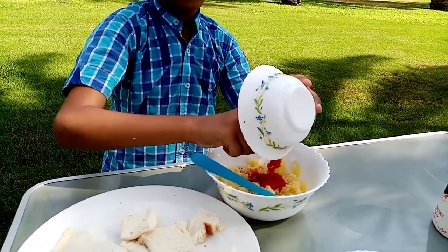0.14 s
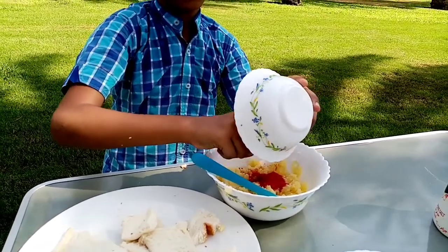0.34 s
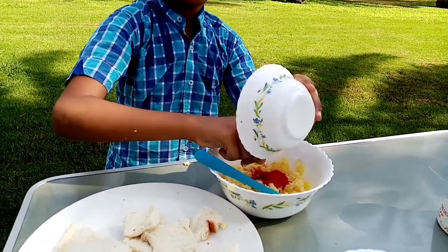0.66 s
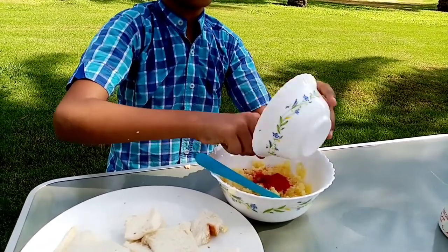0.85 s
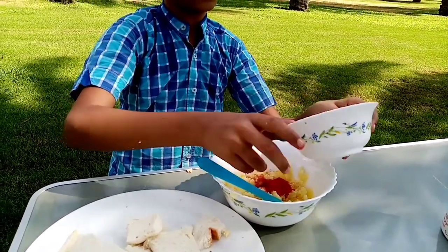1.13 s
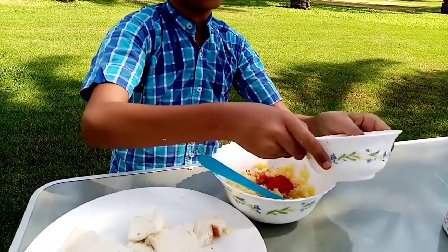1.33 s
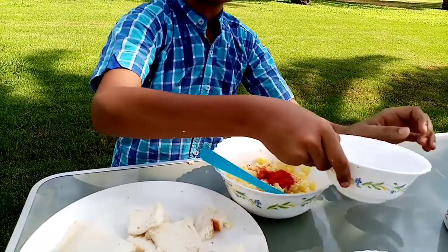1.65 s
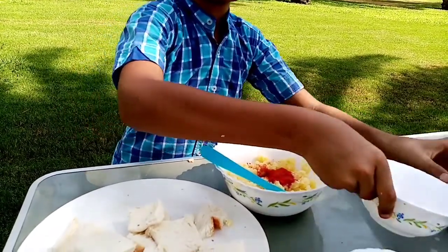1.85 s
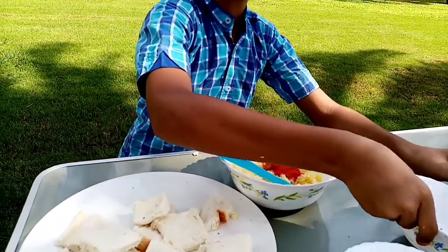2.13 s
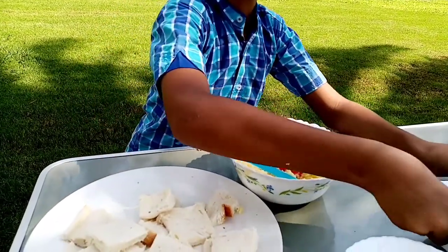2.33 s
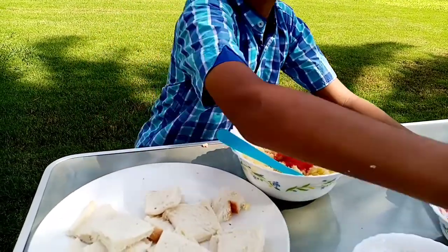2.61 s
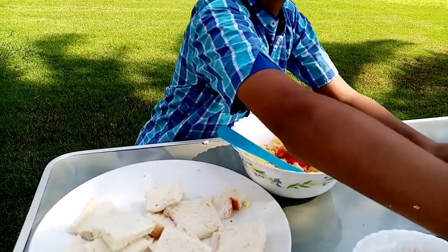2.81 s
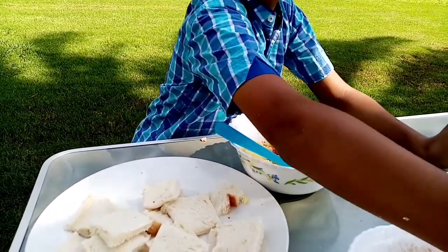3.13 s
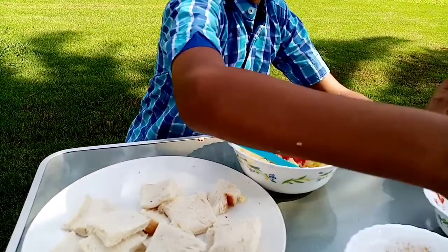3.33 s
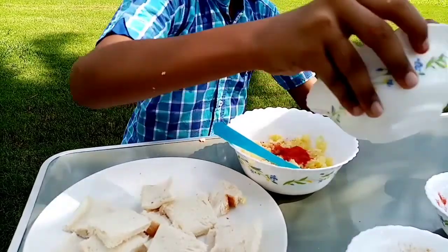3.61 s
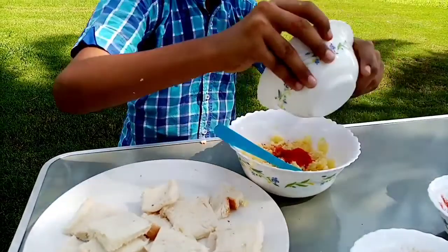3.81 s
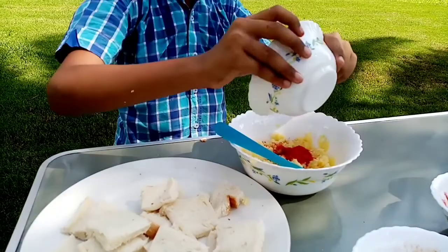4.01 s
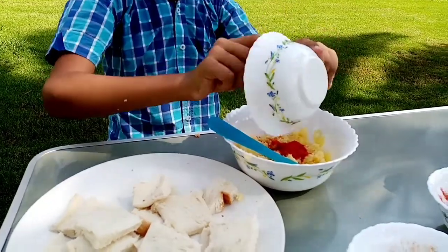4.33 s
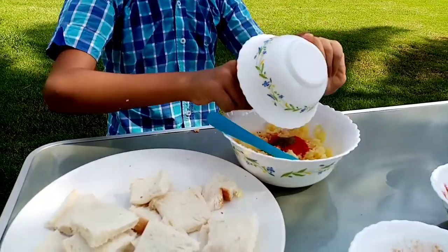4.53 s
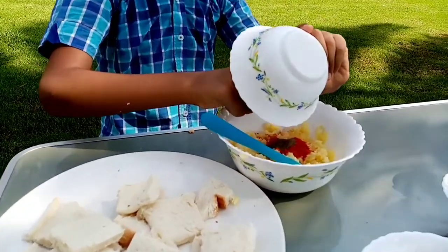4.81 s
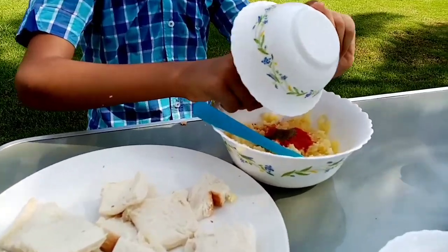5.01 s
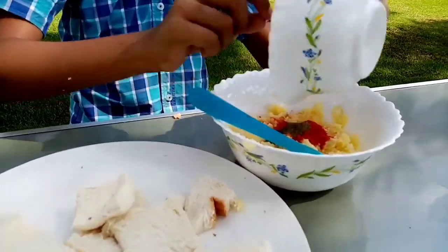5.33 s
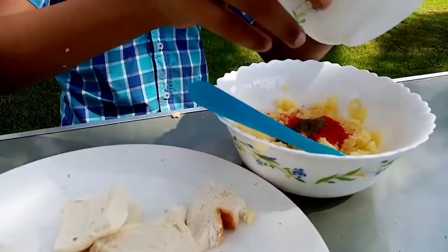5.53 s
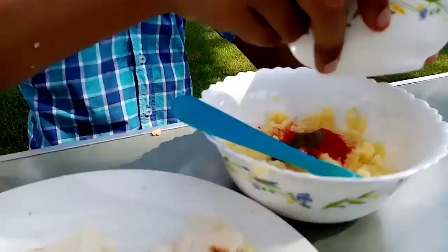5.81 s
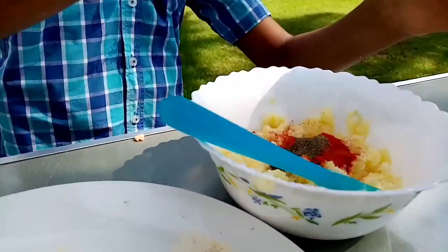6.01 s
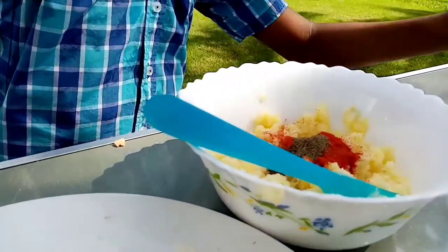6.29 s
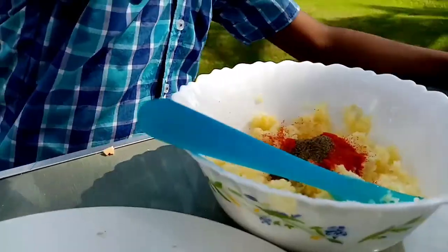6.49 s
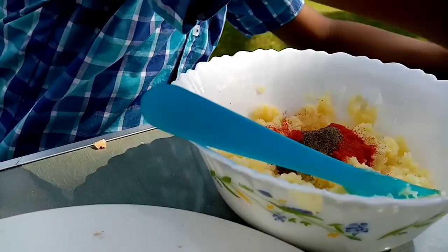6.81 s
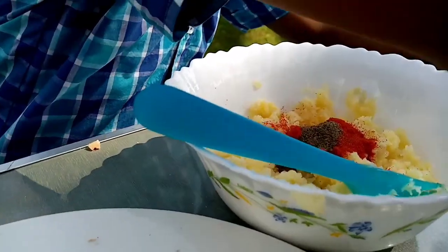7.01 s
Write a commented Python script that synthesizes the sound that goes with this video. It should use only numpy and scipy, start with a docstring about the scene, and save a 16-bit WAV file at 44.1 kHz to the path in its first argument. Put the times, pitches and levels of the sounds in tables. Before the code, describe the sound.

A quiet garden with a steady, low hum of distant traffic, a little stronger on the right. From 0 to 1.7 seconds small birds twitter busily in short, thin, gliding whistles with a couple of harsher squeaks, and a very faint high insect buzz swells until about 1.2. At 1.44 a light china clink rings close by. At 1.95 a bowl hits the glass table with a loud, short knock, then rattles in uneven taps from 2.2 to 2.5, with a faint tap at 2.97. Birds continue more sparsely, with clear falling whistles at 3.8 and 4.2. Soft hand and leaf rustle rises near 5.9; a distant, rough crow caw sounds at 5.7 to 6.0. Tiny ticks on china follow from 6.1. At 6.76 another bowl lands with a bright, hard clatter, knocking again at 7.08 amid chirps and rustling.

```python
"""China bowls knock against each other and are set down on a glass garden table, close to spaced microphones:
each blow and its noisy chatter excite banks of decaying modes. Songbirds whistle in the trees as gliding near-sines,
a crow caws once as a frequency-modulated tone, and all of them echo in the trees; an insect buzzes as narrow-band
noise. Distant traffic hums as third-octave noise under the rustle of leaves and hands, which is banded noise."""
import sys
import numpy as np
from scipy import signal
from scipy.io import wavfile
from scipy.ndimage import uniform_filter1d

SR = 44100
rng = np.random.default_rng(int(sys.argv[2]) if len(sys.argv) > 2 else 0)


def persist_wave(psi):
    """Save psi, clipped to +-1, as 16-bit WAV."""
    counts = np.round(np.clip(psi, -1, 1) * 32767).astype(np.int16)
    wavfile.write(sys.argv[1], SR, np.atleast_2d(counts).T)


N = 315309
t = np.arange(N) / SR

# Arrival at the left microphone ahead of the right, in seconds
NEAR_LEAD_S, SECOND_BOWL_LEAD_S, BIRD_LEAD_S, FAR_LEAD_S = 0.00086, 0.00058, 0.00101, 0.001188
RIGHT_DB = 3.5  # right minus left level of traffic and of the lower rustle


def undb(db):
    """Decibels are twenty times the logarithm of an amplitude ratio; this inverts them."""
    return 10 ** (np.asarray(db) / 20)


def level(x, db):
    """Root-mean-square amplitude measures level: scales x to db."""
    return x * undb(db) / np.sqrt(np.mean(x ** 2))


def band(x, lo_hz, hi_hz, order=2):
    """A Butterworth band-pass is maximally flat between its two cutoffs."""
    sos = signal.butter(order, [lo_hz, min(hi_hz, 0.45 * SR)], "band", fs=SR, output="sos")
    return signal.sosfilt(sos, x)


def walk(rate):
    """Low-pass random modulation: random values held 1 / rate s and smoothed twice; spread near 1."""
    hold = int(SR / rate)
    steps = np.repeat(rng.standard_normal(N // hold + 1), hold)
    return 2.01 * uniform_filter1d(uniform_filter1d(steps, hold), hold)[:N]


def add(out, pair, s, pan_db, lead_s):
    """Stereo localisation by level and time difference: left is pan_db louder and lead_s earlier."""
    for channel, (start_s, db) in enumerate([(s, pan_db / 2), (s + lead_s, -pan_db / 2)]):
        i = max(int(start_s * SR), 0)
        part = (pair[channel] * undb(db))[:N - i]
        out[channel, i:i + len(part)] += part


def ring(modes, unlike, chatter_t60, chatter_db, crack_db,
         scatter=0.94, crack_from=0.18, alternate=True, size=8000):
    """Modal synthesis: a blow and dying chatter drive decaying modes with a crack between them; peak 1.

    unlike sets how far mode phases (rad) and chatter differ between the microphones."""
    hz, db, t60 = np.transpose(modes)[:, :, None]
    u = np.arange(size) / SR
    chance = scatter * rng.standard_normal((4, len(modes), 1))
    # neighbouring modes may start in opposite directions
    sign = (-1) ** (alternate * np.arange(len(modes))[:, None])
    decay = sign * undb(db + 3 * chance[0] - 60 * u / t60)
    phase = 2 * np.pi * hz * (1 + 0.0062 * chance[1]) * u
    body = np.array([np.sum(decay * np.sin(phase + unlike * side), axis=0) for side in chance[2:]])
    impulse = undb(crack_db) * (u == 0)
    body += band(impulse, crack_from * hz.min(), 0.52 * hz.max(), order=1)
    body = signal.sosfilt(signal.butter(2, 1.13 * hz.min(), "high", fs=SR, output="sos"), body)

    shared, *own = rng.standard_normal((3, size))
    jitter_db = 3.8 * rng.standard_normal(size)
    chatter = undb(chatter_db + jitter_db - 60 * u / max(chatter_t60, 0.005))
    force = (shared + unlike * np.array(own)) * chatter
    contact = 4  # samples that the blow lasts
    force[:, :contact] += np.hanning(contact + 2)[1:-1] * 2 / contact
    out = signal.fftconvolve(body, force, axes=1)[:, :size]
    return out / np.abs(out).max()


def knocks():
    """Modal superposition: each impact thuds in the table top, rings the rim and chatters in the china."""
    # Bowl meets bowl or table, peaks before panning:
    # start_s, thud_peak_db, rim_peak_db, china_peak_db, thud_tilt_db (per octave)
    blows = [(1.9454, -9.5, -18, -24, -7), (1.9521, -20, -28, -30, -4), (1.9622, -30, -35.5, -39, 7),
             (2.004, -30.5, -48, -73, -17), (2.031, -43, -65, -80, -6), (2.1863, -16.5, -29, -34, 7),
             (2.1988, -18.5, -37, -46, 18), (2.2219, -24, -34, -34.5, -1), (2.2331, -22.5, -41, -45, 1),
             (2.2596, -22, -42, -44.5, 5), (2.2754, -25, -59, -61, -2), (2.2882, -34, -65, -80, -21),
             (2.3716, -21.5, -34, -40.5, 15), (2.383, -21, -33, -42, 5), (2.4067, -29.5, -39.5, -39, -1),
             (2.4894, -51, -51.5, -62, -4), (2.971, -36, -53, -66, -16), (6.7586, -9.5, -16, -18, 11),
             (6.7649, -29, -19, -45, 12), (6.7704, -25, -27, -37, 4), (6.779, -24, -42, -22.5, 3),
             (6.786, -17.5, -30, -25, -12), (6.7983, -24.5, -40, -25, 12), (7.0788, -16, -21, -27, 12),
             (7.0908, -23.5, -32, -31.5, 5)]
    # Modes of the table top: pitch_hz, level_db, t60_s
    table_modes = [(110, -16, 0.051), (165, -25, 0.02), (216, -2.5, 0.12), (310, -4.5, 0.036),
                   (370.5, 8.5, 0.065), (482, 4.5, 0.057), (519, -2, 0.044), (570, -2, 0.065),
                   (356, 12, 0.016)]
    # Modes of the bowl's rim: pitch_hz, level_db, t60_s
    rim_modes = [(700, -3, 0.021), (890, -7.5, 0.057), (993, -12.5, 0.075), (1074, -6.5, 0.031),
                 (1285, 0.5, 0.017), (1627, -3.5, 0.02), (1950, 3.5, 0.0096), (2350, -9, 0.0089),
                 (2750, -11.5, 0.0098)]
    # Modes of the china: pitch_hz, level_db, t60_s
    china_modes = [(3430, 15, 0.0038), (3520, 2.5, 0.021), (4420, 5.5, 0.01), (5140, -2, 0.012),
                   (5350, -10, 0.0062), (6090, 19, 0.0029), (6700, 5, 0.011), (7300, -12, 0.007),
                   (9330, -2, 0.007), (9890, -7.5, 0.029), (14300, -26, .01)]
    # Chatter decay for a -21.5 dB thud: table_t60_s, rim_t60_s, china_t60_s
    chatter_t60_s = (0.14, 0.083, 0.05)
    shrink = 0.042  # share of the chatter's length lost per dB of a harder blow
    swap_s = 4.5  # from here the second bowl lands, further right
    first_bowl = (-3, NEAR_LEAD_S)  # left minus right dB, lead s
    second_bowl = (-5.5, SECOND_BOWL_LEAD_S)
    out = np.zeros((2, N))
    for s, thud_db, rim_db, china_db, tilt_db in blows:
        thud_t60, rim_t60, china_t60 = np.array(chatter_t60_s) * (1 - shrink) ** (thud_db + 21.5)
        # a blow near the edge of the top favours its higher modes
        pivot_hz = table_modes[3][0]
        tilted = [(hz, db + tilt_db * np.log2(hz / pivot_hz), t60) for hz, db, t60 in table_modes]
        thud = ring(tilted, 0.38, thud_t60, -30.5, 19.5, scatter=0.65, crack_from=2.0, alternate=False)
        rim = ring(rim_modes, 1.1, rim_t60, -16, 20, scatter=0.7)
        china = ring(china_modes, 1.44, china_t60, -26.0, 4.1)
        china_pair_db = china_db + np.array([[-2.5], [2.5]])
        knock = -undb(thud_db) * thud + undb(rim_db) * rim + undb(china_pair_db) * china
        add(out, knock, s, *(first_bowl if s < swap_s else second_bowl))
    return out


def clink():
    """Impact excitation of a held bowl's modes as rim touches rim."""
    # Rim touches rim, before panning: start_s, peak_db
    touches = [(1.4424, -19)]
    # Modes of the held bowl: pitch_hz, level_db, t60_s
    held_modes = [(393, -8, 0.05), (730, -3.5, 0.045), (1100, -8, 0.049), (1120, 13.5, 0.007),
                  (1610, -1, 0.037), (1900, 4, 0.023), (2410, -14, 0.034), (2924, -2, 0.07),
                  (4534, -8, 0.086), (5000, -8, .02), (6180, -12, 0.022), (6500, -8, 0.025),
                  (8330, -19, 0.025), (9830, -8, 0.019)]
    out = np.zeros((2, N))
    for s, db in touches:
        touch = undb(db) * ring(held_modes, 0.6, 0.09, -24.0, 12.0, scatter=0.3)
        add(out, touch, s, -2.5, NEAR_LEAD_S)
    return out


def singing_rim():
    """Free vibration: a freed rim sings on in one exponentially decaying sine."""
    # Freed rims, before panning: start_s, peak_db
    sings = [(1.945, -55), (2.387, -51.5), (6.798, -53), (7.09, -51)]
    sing_hz, sing_t60_s, attack_s = 1475, 0.66, 0.0018
    out = np.zeros((2, N))
    u = np.arange(SR // 4) / SR
    for s, db in sings:
        envelope = undb(db - 60 * u / sing_t60_s) * np.clip(u / attack_s, 0, 1)
        sing = envelope * np.sin(2 * np.pi * sing_hz * u)
        add(out, [sing, sing], s, -4, NEAR_LEAD_S)
    return out


def ticks():
    """Short band-limited noise bursts: faint ticks of nails and crumbs on china."""
    # Ticks, before panning: start_s, peak_db, centre_hz
    contacts = [(2.0933, -62, 4110), (2.8314, -52, 6500), (2.866, -55, 6400), (2.923, -58.5, 6300),
                (2.967, -61, 6620), (4.645, -56.5, 6400), (4.828, -61, 6350), (5.318, -61.5, 6360),
                (6.1178, -52, 3750), (6.231, -56, 9150), (6.328, -54, 6400), (6.3647, -49.5, 6140),
                (6.374, -54, 4570), (6.4286, -55, 5500), (6.489, -51, 6400), (6.84, -46, 6100),
                (6.8543, -44, 5900)]
    out = np.zeros((2, N))
    u = np.arange(900) / SR
    for s, db, hz in contacts:
        burst = rng.standard_normal((2, len(u))) * undb(-60 * u / 0.053)
        narrow = band(burst, hz / 1.08, hz * 1.06, order=1)
        tick = narrow + undb(-14) * band(burst, hz / 2.6, hz * 1.7)
        add(out, tick * undb(db) / np.abs(tick).max(), s, -13, NEAR_LEAD_S)
    return out


def bowls():
    """Linear superposition of knocks, clink, singing rims and ticks."""
    return knocks() + clink() + singing_rim() + ticks()


def note(length, hz, attack=0.0017, release=0.0018):
    """Phase is the integral of frequency hz(u); returns time u, phase and an envelope of rms 1 for a sine."""
    u = np.arange(0, length, 1 / SR)
    ends = np.clip(u / attack, 0, 1) * np.clip((length - u) / release, 0, 1)
    return u, 2 * np.pi * np.cumsum(hz(u)) / SR, np.sqrt(2) * ends


def whistles():
    """Frequency glide: near-sines slide towards a held pitch and throb as they slide."""
    # Whistled notes, rms before wavering and panning; fade_db is over the note, pan_db is left minus right:
    # start_s, length_s, start_hz, held_hz, slide_s, level_db, fade_db, pan_db
    notes = [(0.0, 0.05, 3390, 3416, .03, -61, 2.5, 8), (0.066, 0.1, 3430, 3520, 0.055, -58.5, -27, 8.5),
             (0.207, 0.016, 3640, 4100, 0.02, -59, -6, -2), (0.229, 0.022, 3720, 4250, 0.017, -57, -9, 0),
             (0.232, 0.025, 4120, 3520, 0.01, -59, -3, 7), (0.218, 0.036, 3210, 3330, 0.018, -62.5, 3, -6),
             (0.303, 0.053, 2850, 2890, .02, -68.5, -1, 1), (0.24, 0.07, 3330, 2870, 0.024, -57, -10, -9),
             (0.313, 0.014, 2410, 1655, 0.018, -56.5, 0, -10), (0.408, 0.025, 3750, 3600, 0.022, -61, 3, 2),
             (.425, .03, 3690, 3780, .02, -65, 2, 2), (0.42, 0.01, 3180, 3450, .012, -66, 0, 2),
             (0.432, 0.054, 3330, 3430, 0.028, -59.5, 9, 4), (0.487, .014, 3530, 2980, 0.015, -57, -4, 1),
             (0.516, 0.14, 3400, 3360, .02, -68, -1, 2), (0.594, 0.016, 2520, 2800, .012, -61, 0, 1),
             (.61, 0.014, 2720, 3320, 0.01, -61, 0, 3), (0.212, 0.013, 1920, 2350, 0.016, -64, 4, -7),
             (0.578, 0.016, 2280, 1950, 0.015, -63, 1, -10), (0.566, 0.016, 2600, 2900, .014, -61, -8, 4),
             (0.614, 0.013, 3520, 4400, 0.0099, -60, 2, 3), (0.625, 0.07, 3430, 2760, 0.0287, -59, 12, 2),
             (0.628, .012, 3930, 3450, .012, -64, -3, 2), (0.705, 0.0085, 2330, 1610, .013, -51, 0, -10),
             (0.719, 0.016, 2300, 1580, .017, -54, -10, -8), (0.726, 0.071, 2760, 2790, 0.022, -73, 5, -7),
             (0.797, 0.062, 3600, 3560, 0.063, -66, 8, 9.5), (0.827, 0.066, 3270, 3450, 0.057, -58, 8, 1),
             (1.004, 0.018, 3780, 2390, 0.019, -47, -7, 1),
             (1.023, 0.012, 2420, 2120, 0.012, -55.5, -4, -2),
             (1.03, 0.033, 3230, 2470, 0.031, -55.5, -1, 3),
             (1.052, 0.043, 3300, 2970, 0.051, -62.5, -3, -10),
             (1.066, 0.022, 2350, 2280, .02, -66, -9, -8), (1.0, 0.014, 5700, 4850, .022, -62, -1, -12),
             (1.05, 0.023, 1720, 1600, .025, -65, -2, 0), (1.229, 0.037, 3620, 3600, 0.026, -56, -3, -7),
             (1.276, 0.064, 3430, 3330, 0.045, -56, 4, 2), (1.328, 0.019, 2800, 2610, 0.015, -62, 2, 5),
             (1.338, 0.052, 3350, 2570, 0.04, -61.5, 3, 1), (1.295, 0.061, 3000, 3200, .06, -69, 7, 2),
             (1.342, .015, 3580, 3380, 0.013, -51, -1, 0), (1.371, .025, 3480, 3050, 0.023, -59, -4, -5),
             (1.375, 0.042, 3760, 3760, .02, -62, -1, -1), (1.336, .022, 5700, 5600, .02, -66, -4, -3),
             (1.587, 0.079, 2750, 3367, 0.063, -63.5, 3.5, -2.5),
             (1.677, 0.014, 3300, 2970, 0.016, -56, -6, 0), (1.685, 0.016, 2900, 2300, 0.012, -63, -4, -7),
             (1.613, 0.071, 1525, 1670, 0.059, -63, -1, -3), (1.705, 0.071, 3350, 3310, .03, -70, -11, -4),
             (1.882, 0.073, 2630, 3176, 0.026, -72, 17.5, -8),
             (1.98, 0.021, 3300, 2630, 0.019, -57, -8, -8), (2.29, 0.08, 2160, 2130, .02, -66.5, -4, -9),
             (2.479, 0.0096, 2380, 1860, 0.02, -51, 0, -6), (2.848, 0.1, 2750, 2650, 0.08, -61, 5, -3),
             (2.935, 0.033, 2650, 2080, .024, -57.5, -5.5, -9),
             (3.178, 0.083, 2160, 2073, 0.026, -63, 1, -13), (3.183, 0.067, 3070, 3170, .08, -72, -11, -9),
             (3.098, 0.084, 3040, 3100, .02, -76.5, 0, -9), (3.288, 0.09, 2410, 2410, 0.055, -60, 0, -4.5),
             (3.398, .016, 3860, 2280, .016, -59, -1, -6), (3.39, 0.0096, 2180, 1950, .012, -53.5, 2, -10),
             (3.41, 0.01, 2200, 1950, .012, -57, .3, -5), (3.715, 0.024, 2870, 2700, 0.01, -66.5, -3, 6),
             (3.761, 0.022, 3490, 3500, .025, -59, 3, 7), (3.781, 0.09, 3480, 1950, 0.064, -48.5, -12, -4),
             (4.048, 0.039, 3230, 3110, 0.035, -75, -4, -12),
             (4.094, 0.021, 3470, 2670, 0.015, -67, -3, -5),
             (4.165, 0.084, 3350, 1936, .061, -49, -9.5, -3), (4.483, 0.11, 3170, 3120, 0.035, -62, -13, 2),
             (4.476, 0.072, 3700, 3840, .03, -74, -10, -9),
             (4.665, 0.069, 2930, 2820, 0.047, -65.5, -0.5, 8.5),
             (4.758, 0.046, 2880, 2880, .03, -75, -2, -1), (4.672, 0.075, 5720, 5760, 0.024, -78, 4, -5),
             (5.519, 0.055, 3760, 3540, 0.049, -65.5, 6, -7),
             (5.546, 0.0082, 2120, 1895, .009, -56, -2, -1), (5.83, 0.065, 3570, 3360, 0.035, -55, -5, 0),
             (5.915, 0.024, 3550, 3370, 0.025, -61, -1, -5), (5.957, 0.13, 3350, 3400, 0.064, -71, -3, -1),
             (6.073, 0.0092, 3830, 3300, 0.01, -54.5, 0, -8.5),
             (6.117, 0.013, 3300, 4070, 0.011, -61, -2, -5), (6.158, 0.036, 3430, 3260, .03, -65, -2, -8),
             (6.198, 0.026, 3490, 3170, 0.02, -55.5, -16, -9), (6.938, 0.028, 3230, 3300, .02, -57, -3, -7),
             (6.953, 0.023, 2270, 2240, .02, -63.5, 2, -10), (7.048, 0.02, 3600, 3600, .02, -57, 0, -10),
             (6.962, 0.055, 3490, 3630, 0.023, -48.5, -6, -11.5),
             (7.119, 0.04, 3270, 3520, 0.041, -53, 2, -2)]
    attack_s, release_s = 0.004, 0.005
    slide_ease = 1.7  # over 1: the slide slows into the held pitch
    throb_db, throb_s = -12, 0.019  # dip per octave slid, period
    throb_end = 0.8  # share of the slide after which the throb has died
    octave_at_3k_db, octave_tilt_db = -24, 18  # second partial at 3 kHz; more per octave of pitch
    out = np.zeros((2, N))
    warble = 0.2 * walk(250) + 0.22 * np.array([walk(40), walk(40)])  # phase, rad
    for s, length, hz, held_hz, slide, db, fade_db, pan_db in notes:
        ease = slide_ease if slide < 0.8 * length else 1
        pitch = lambda u: held_hz * (hz / held_hz) ** (np.clip(1 - u / slide, 0, 1) ** ease)
        u, phase, ends = note(length, pitch, attack_s, release_s)
        phase = phase + np.roll(warble, -int(s * SR), axis=1)[:, :len(phase)]
        octaves = abs(np.log2(hz / held_hz))
        throb = np.sin(np.pi * u / throb_s) ** 2
        throb_fade = 2 * np.clip(throb_end - u / slide, 0, 0.5)
        dip_db = throb_db * octaves * throb * throb_fade
        octave_db = octave_at_3k_db + octave_tilt_db * np.log2(pitch(u) / 3000)
        wave = np.sin(phase) + undb(octave_db) * np.sin(2 * phase)
        add(out, ends * undb(db + dip_db + fade_db * u / length) * wave, s, pan_db, BIRD_LEAD_S)
    return out


def squeaks():
    """Additive harmonic synthesis: a harsher bird whose pitch sags at the end of each note."""
    # Squeaks, before wavering and panning; odd_db is added to odd partials:
    # start_s, length_s, fundamental_hz, level_db, odd_db
    calls = [(0.949, 0.053, 1937, -50.5, -7), (1.262, 0.065, 1902, -58, 6)]
    # Partials of the squeak: multiple, level_db
    partials = [(1, -15.5), (2, 0.5), (3, -12), (4, -19), (6, -22.5)]
    sag, sag_s = 0.04, 0.018  # share of the pitch, duration
    out = np.zeros((2, N))
    for s, length, hz, db, odd_db in calls:
        pitch = lambda u: hz * (1 - sag * np.clip(1 - (length - u) / sag_s, 0, 1) ** 2)
        u, phase, ends = note(length, pitch, 0.01, 0.0016)
        wave = 0
        for k, part_db in partials:
            k = round(k)
            wave = wave + undb(db + part_db + odd_db * (k % 2)) * np.sin(k * phase)
        tone = ends * wave
        add(out, [tone, tone], s, 10, BIRD_LEAD_S)
    return out


def drone():
    """Inharmonic additive synthesis: a far, thin drone of partials over an unheard fundamental, with breathy hiss."""
    # The drone, before wavering and panning; pitches are of the unheard fundamental:
    # start_s, length_s, start_hz, end_hz, level_db, swell_db (over its length)
    s, length, hz, end_hz, db, swell_db = (6.38, .38, 1405, 1378, -71, 4)
    # Partials of the drone: multiple, level_db
    partials = [(2, -2), (2.27, -6), (3, -7), (4.15, -6)]
    out = np.zeros((2, N))
    u, phase, ends = note(length, lambda u: hz + (end_hz - hz) * u / length)
    phase = phase + 0.6 * walk(200)[:len(phase)]
    wave = sum(undb(part_db) * np.sin(k * phase) for k, part_db in partials)
    hiss = level(band(rng.standard_normal((2, len(u))), 2000, 2800), -2)
    add(out, ends * undb(db + swell_db * u / length) * (wave + hiss), s, -3.5, BIRD_LEAD_S)
    return out


def crow():
    """Frequency modulation: a rough tone swings in pitch some eighty times a second, with breath noise."""
    # The caw, before panning: start_s, length_s, start_hz, peak_hz, end_hz (of the throat), level_db
    s, length, hz, peak_hz, end_hz, db = (5.695, .345, 1660, 1880, 1700, -49.5)
    attack_s, release_s, flutter_hz, fade_db = 0.043, 0.054, 78.2, -1.5
    out = np.zeros((2, N))
    throat = lambda u: np.interp(u / length, [0, 0.3, 1], [hz, peak_hz, end_hz])
    u, phase, ends = note(length, throat, attack_s, release_s)
    flutter_rate = flutter_hz * (1 + 0.06 * walk(40)[:len(u)])
    flutter = 2 * np.pi * np.cumsum(flutter_rate) / SR
    phase = phase + 2.3 * np.sin(flutter) + 0.45 * walk(300)[:len(u)]
    tone = (np.sin(phase) + undb(-21.0) * np.sin(2 * phase)) * (1 + 0.42 * np.cos(flutter))
    low, high = rng.standard_normal((2, 2, len(u)))
    rasp = level(band(low, 1440, 2010), -7.0) + level(band(high, 5600, 7000), -23.0)
    add(out, ends * undb(db + fade_db * u / length) * (tone + rasp), s, -6.5, 0.0018)
    return out


def tree_echo(dry):
    """Reverberation as convolution with decaying noise: the nearest branches echo first and louder."""
    trees_t60_s, branches_t60_s = 0.55, 0.05
    branches_db = 7  # against the farther trees
    echo_db = -8.5  # energy of the whole response
    u = np.arange(SR // 2) / SR
    decay = undb(-60 * u / trees_t60_s) + undb(branches_db - 60 * u / branches_t60_s)
    response = rng.standard_normal((2, len(u))) * decay * np.clip(u / 0.0044, 0, 1)
    response = response * undb(echo_db) / np.sqrt(np.sum(response ** 2, axis=1, keepdims=True))
    return signal.fftconvolve(dry, response, axes=1)[:, :N]


def birds():
    """Random amplitude modulation: whistles, squeaks and drone waver on their way; the crow joins, all echo."""
    waver = undb(1.0 * walk(70) + 1.2 * np.array([walk(70), walk(70)]))
    direct = (whistles() + squeaks() + drone()) * waver + crow()
    return direct + tree_echo(direct)


def insect():
    """Narrow-band noise: a buzz that flickers in level and swells."""
    start_s, length_s, attack_s, release_s = 0.35, 0.83, 0.071, 0.12
    buzz_db, swell_db = -78, 9.5  # rms before flicker and swell; rise over its length
    u = t - start_s
    ends = np.clip(u / attack_s, 0, 1) * np.clip((length_s - u) / release_s, 0, 1)
    buzz = level(band(rng.standard_normal((2, N)), 6880, 7140), buzz_db) * undb(2.4 * walk(61.3))
    return buzz * ends * undb(swell_db * u / length_s + np.array([[2.5], [-2.5]]))


def rustle():
    """Amplitude-modulated noise bands: leaves, sleeves and hands brushing."""
    # Course of the rustle, before band shares and flicker: time_s, level_db
    course = [(0.0, -78), (.12, -82.5), (.65, -73), (1.4, -76), (1.69, -80.5), (1.93, -82), (2.1, -76.5),
              (2.47, -81.5), (3.17, -80.5), (3.25, -72), (3.42, -80), (3.7, -82), (3.85, -77), (4.44, -83),
              (4.7, -78), (4.9, -83.5), (5.38, -81), (5.9, -65.5), (6.15, -76), (6.55, -70.5), (6.9, -72.5),
              (7.15, -61.5)]
    # Bands of the rustle; follow is how far the band follows the level, 0-1:
    # low_hz, high_hz, share_db, follow
    bands = [(2810, 4430, 3.5, 0.85), (3600, 3700, -4.5, 1), (5170, 6900, 2, 0.84), (8270, 10070, -6, 0.85),
             (10000, 16300, -8, 0.7)]
    right_treble_db = 5.5  # right minus left for bands reaching 7 kHz or more
    out = np.zeros((2, N))
    time_s, course_db = np.transpose(course)
    db = np.interp(t, time_s, course_db)
    for lo_hz, hi_hz, share_db, follow in bands:
        grain = rng.standard_normal((2, N)) * undb(1.6 * rng.standard_normal(N))
        band_db = db.mean() + follow * (db - db.mean()) + 1.3 * walk(12)
        hiss = level(band(grain, lo_hz, hi_hz), share_db) * undb(band_db)
        right_db = RIGHT_DB if hi_hz < 7000 else right_treble_db
        out += hiss * undb(np.array([[-1], [1]]) * right_db / 2)
    return out


def traffic():
    """Interaural coherence falls with frequency: flickering third-octave noise, alike at both microphones in the bass."""
    # Relative spectral density of the traffic: pitch_hz, density_db (per Hz)
    spectrum = [(12, -65), (20, -48), (32, -42), (48, -13.5), (109, -1), (163, -3.5), (248, -7), (354, -15),
                (585, -20.5), (636, -18.5), (1010, -23), (1140, -25.5), (1570, -23.5), (2650, -37.5),
                (3000, -34.5), (3900, -60), (6600, -120)]
    traffic_db = -47.5  # rms before the left-right balance
    alike_hz = 950  # above this the sound differs more between the microphones
    out, lead = np.zeros((2, N)), int(FAR_LEAD_S * SR)
    hz_points, db_points = np.transpose(spectrum)
    for hz in 25 * 2 ** (np.arange(22) / 3):
        noise = rng.standard_normal((3, N + lead))
        shared, left, right = band(noise, hz * 2 ** (-1 / 6), hz * 2 ** (1 / 6))
        alike = 1 / (1 + (hz / alike_hz) ** 1.76)
        common = np.array([shared[lead:], shared[:N]])  # the left microphone hears it first
        own = np.array([left[:N], right[:N]])
        pair = np.sqrt(alike) * common + np.sqrt(1 - alike) * own
        density_db = np.interp(np.log(hz), np.log(hz_points), db_points)
        out += pair * undb(density_db + 0.37 * walk(4.3))
    return level(out, traffic_db) * undb(np.array([[-RIGHT_DB], [RIGHT_DB]]) / 2)


def scene():
    """Superposition of sound pressures from the bowls to the background."""
    return bowls() + birds() + insect() + rustle() + traffic()


def record(dry):
    """Band limitation: the microphones lose the deep bass; the recorder cuts the top."""
    dry = signal.sosfilt(signal.butter(2, 45.0, "high", fs=SR, output="sos"), dry)
    top_hz = 15900
    return signal.sosfilt(signal.ellip(8, 0.2, 70, top_hz, fs=SR, output="sos"), dry)


dry = scene()
out = record(dry)
persist_wave(out)
```